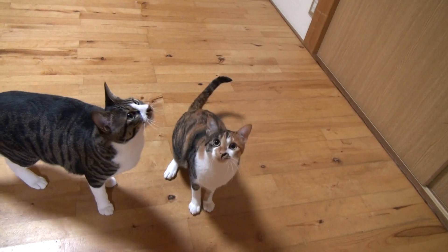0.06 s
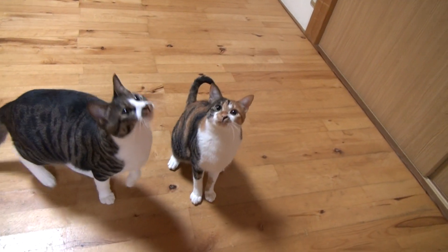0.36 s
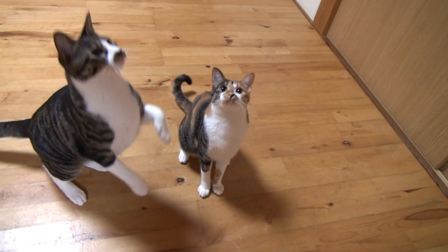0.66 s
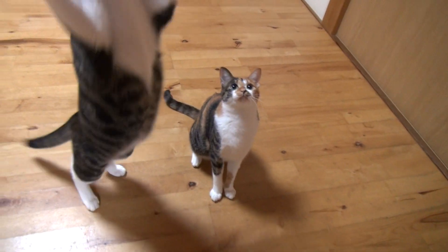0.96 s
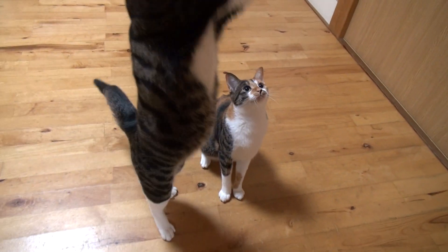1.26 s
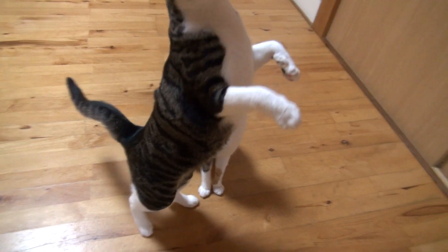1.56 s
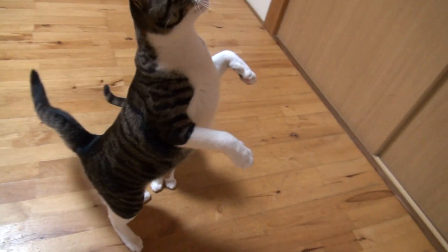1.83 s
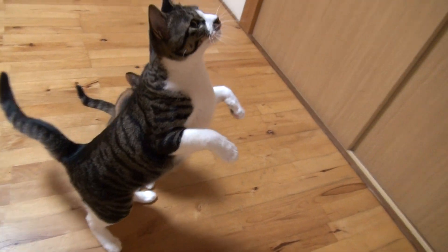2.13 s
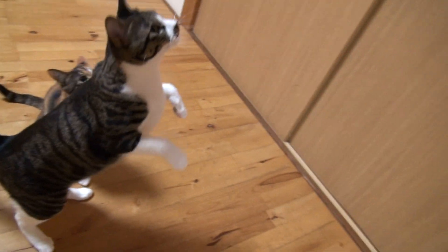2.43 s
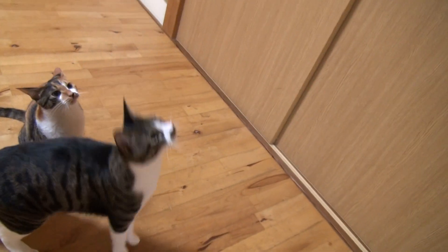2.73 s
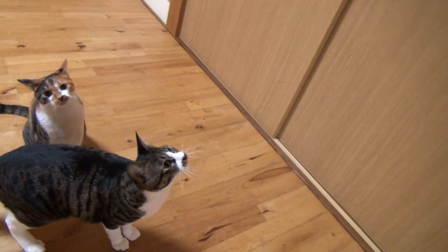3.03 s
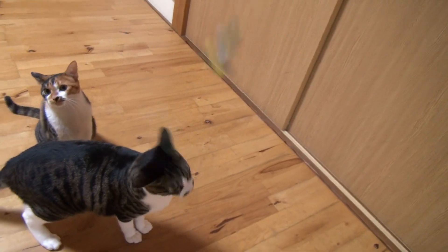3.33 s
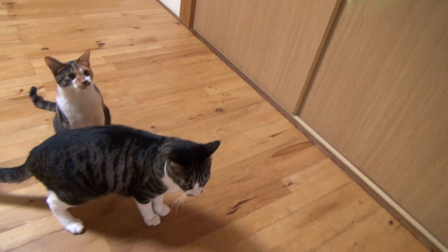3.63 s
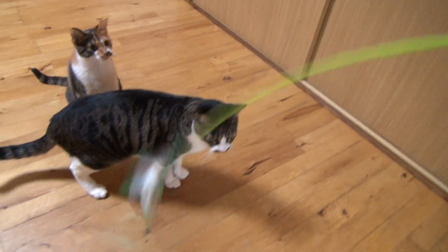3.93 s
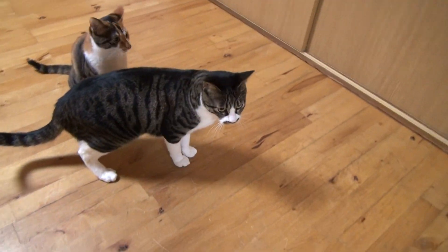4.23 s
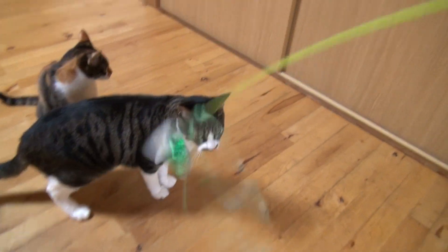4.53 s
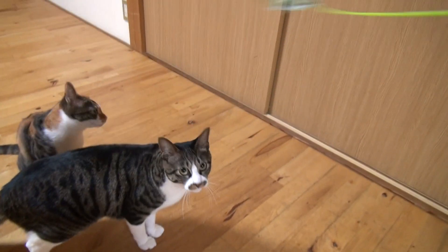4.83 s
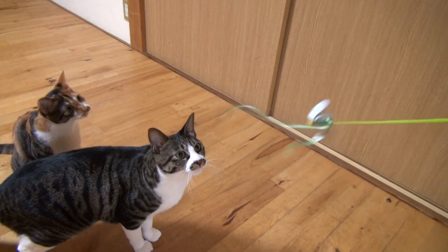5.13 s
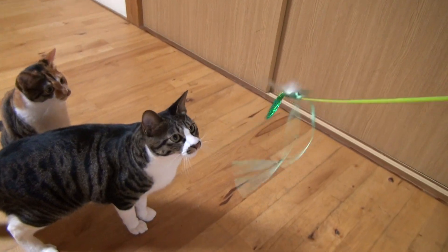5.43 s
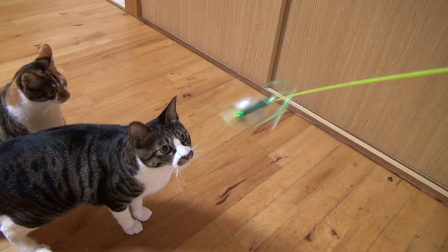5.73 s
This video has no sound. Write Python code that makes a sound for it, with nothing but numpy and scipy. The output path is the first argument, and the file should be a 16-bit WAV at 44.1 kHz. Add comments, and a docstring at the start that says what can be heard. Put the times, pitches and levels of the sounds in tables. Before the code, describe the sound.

Two cats play with a wand toy on a wooden floor, close to a stereo microphone in a small room. Light ticks and a tinsel rustle open the scene. From about 0.5 to 1 second comes a scramble of sharp claw clicks, paw knocks and scuffs, with the strongest knocks near 0.7. A second cluster follows from 1.2 seconds, peaking in the loudest, sharpest click at 1.4. The play thins to scattered ticks and short flicks of tinsel and feathers, with soft padded thumps around 2.1 and 2.8 seconds. Ticking, rustling and shuffling pick up from 2.8 to 3.4 seconds, ease briefly, and return with more light knocks from 4 to 4.7. After about 5 seconds only a very faint rustle remains. The room adds a little reverberation, and a quiet steady hiss lies underneath throughout.

```python
"""A small room with a wooden floor, a stereo microphone close to two cats playing with a wand toy.
Claws and the flicked toy tick sharply, and its tinsel and feathers rustle as it shakes.
Paws scuff and knock on the boards, and the bigger cat's steps thump the floor softly.
The room answers each sound, and a quiet steady hiss lies behind it all."""
import sys
import numpy as np
from scipy import signal
from scipy.fft import rfft, irfft
from scipy.io import wavfile

SR = 44100
rng = np.random.default_rng(int(sys.argv[2]) if len(sys.argv) > 2 else 0)


def pcm_store(signal):
    """Save signal as 16-bit PCM."""
    levels = np.round(np.clip(np.atleast_2d(signal), -1, 1) * 32767)
    wavfile.write(sys.argv[1], SR, levels.astype(np.int16).T)


N = 254739
TIME = np.arange(N) / SR


# claws and toy, close to the microphone: start_s, level_db, pitch_hz, spread_octaves, left_over_right_db
CLAW_TICKS = [(.0407, -22.5, 3550, 0.42, 0), (.1001, -20.5, 2900, 0.38, 2), (.2838, -25.5, 3300, 1, 8),
              (.4765, -24, 6300, 0.88, -4.5), (.5191, -28, 3400, 0.48, 6), (.5488, -10.5, 5200, 0.7, 8.5),
                       (.6225, -17, 4260, 0.96, -1), (.7045, -15, 1520, 1.3, -2),
              (.7275, -17.5, 3660, 0.93, 9), (.732, -19, 4500, 1.1, 3), (.7599, -18, 4350, 0.59, 5),
              (.82, -19.5, 3100, 0.78, -3), (.8965, -16.5, 6560, 0.43, -5), (.9443, -20, 4030, 0.85, 0),
              (1.131, -25, 6200, 0.64, -2), (1.1495, -24.5, 2940, 0.83, 1),
              (1.2915, -15.5, 4470, 0.34, -1.5), (1.3167, -20.5, 4330, 0.77, -1),
              (1.3491, -20.5, 6400, 0.78, -9), (1.3614, -17.5, 5700, 0.79, 4),
              (1.3707, -14, 7000, 0.82, -5), (1.3867, -16, 7100, 0.34, -2), (1.4009, -24, 6100, 0.79, -10),
              (1.4186, -4, 5560, 0.66, -2), (1.514, -19, 5550, .8, -1), (1.6087, -23, 4800, 1.2, -6),
              (1.6707, -23.5, 4200, 0.81, -1), (1.8017, -25, 5770, 0.76, -5), (2.1257, -28, 5440, 1.1, -8),
              (2.1312, -19, 5200, 0.55, 1), (2.5114, -25.5, 5330, 1.1, -1), (2.8079, -24, 2880, 0.87, 1),
              (2.8522, -25.5, 5500, 0.73, 0), (2.8908, -16.5, 5470, 0.91, -3),
              (2.9689, -24.5, 5160, 0.95, -5), (3.0957, -23.5, 3700, .8, 0),
              (3.1609, -13.5, 5800, 0.15, -3), (3.1967, -18, 3160, 0.71, 2), (3.2831, -19, 3760, 0.75, 2),
              (3.3084, -26, 2480, 0.39, 3), (3.3462, -24.5, 4070, 0.76, -5), (3.4458, -20.5, 4400, 0.7, 1),
              (3.9503, -22, 2320, 0.72, -1), (3.9712, -18, 3440, 0.44, 3), (4.0258, -20.5, 3300, 0.41, 5),
              (4.0702, -23, 3320, 0.67, 1), (4.1331, -21.5, 5500, 0.78, -9), (4.17, -19.5, 4300, 0.63, 2),
              (4.2185, -20, 3000, 0.99, 3), (4.2583, -20, 4740, 0.89, 0), (4.2915, -21, 4200, 0.44, -3),
              (4.3894, -19.5, 4370, 1.2, 2.5), (4.4625, -15, 3570, .55, 2), (4.469, -21.5, 4500, .8, 3),
              (4.5619, -27, 4200, 0.74, -3), (4.6638, -24.5, 4000, 1.1, 2), (4.827, -37, 5000, 0.71, 7)]

def ticks(clean_db=-19, lead_in_share=0.25, crunch=0.71, split=0.71, spot_count=4):
    """A faint, brief swell leads into a short ping; hard ticks snap clean, light ones crumble."""
    spots = np.zeros((spot_count, 2, N))  # each spot in the room gets its own reflections
    for k, (start_s, db, hz, octaves, pan_db) in enumerate(CLAW_TICKS + light_ticks()):
        looseness = np.clip(gain_of(1.3 * (clean_db - db)), 0.25, 1.2)
        lead_in = chatter(t60_s=0.013, share=lead_in_share * looseness)[:0:-1]  # reversed, so it swells
        contacts = np.concatenate([lead_in, chatter(t60_s=0.064, share=crunch * looseness)])
        # each contact is itself a flurry of slips within a millisecond or two
        slips = chatter(t60_s=0.0018, share=split * looseness, size=256)
        contact = np.convolve(ping(hz, max(octaves, 0.25)), slips)
        tick = signal.fftconvolve(contact, contacts)
        tick /= np.linalg.norm(tick)
        gains = gain_of(db + np.array([[pan_db], [-pan_db]]) / 2)
        add(spots[k % spot_count], start_s - len(lead_in) / SR - 0.0001, gains * tick)
    return sum(room(spot, wet_db=-6.5, build_s=0.00071, early=1.0, early_s=0.016) for spot in spots)


def light_ticks(over_shaking_db=20.5, vary_db=2, centre_hz=5000, vary_octaves=0.55, pan_db=4, count=64):
    """Rows of small chance ticks of the toy, more frequent and stronger the harder it shakes."""
    level, _ = shaking()
    shares = (np.arange(count) + rng.random(count)) / count
    starts = np.searchsorted(np.cumsum(level) / level.sum(), shares).clip(0, N - 1)
    rows = []
    for i, (force, pitch, side) in zip(starts, rng.standard_normal((count, 3))):
        db = 20 * np.log10(level[i]) + over_shaking_db + vary_db * force
        rows.append((i / SR, db, centre_hz * 2 ** (vary_octaves * pitch), 1.0, pan_db * side))
    return rows


# tone of the tinsel at close range: frequency_hz, gain_db
TINSEL_TONE = [(300, -4), (900, -4), (1800, -8), (3300, -2), (5000, -0.5), (8000, -4), (9500, -4.5),
               (11800, -2.5), (15500, -9)]

def tinsel_rustle(level_db=-0.5, tilt_per_octave=0.22, swish=0.4, scatter=0.32):
    """Tinsel strips snap by the hundreds at ten pitches, over a swish of feathers."""
    grains, power = np.zeros((2, N)), 0
    level, bright_db = shaking()
    for hz in np.geomspace(1400, 10000, 10):
        snaps = crackle(per_s=150, spread_db=3.5) + swish * rng.standard_normal(N)
        side = scatter * snaps * rng.standard_normal(N)
        pair = np.array([snaps + side, snaps - side])
        # brightness tips the spectrum about 4500 Hz
        weight = gain_of(tilt_per_octave * bright_db * np.log2(hz / 4500)) * (hz / 4500) ** 0.081
        grains += weight * signal.oaconvolve(pair, ping(hz, octaves=0.37)[None], axes=1)[:, :N]
        power += weight ** 2
    rustle = unit_rms(coloured(grains / np.sqrt(power), TINSEL_TONE))
    return room(rustle * level * gain_of(level_db), wet_db=-6.5)


# flicks of the wand: start_s, level_db, settle_s, brightness_db
WAND_FLICKS = [(0, -48.5, .14, -12), (.262, -56, .05, -6), (.548, -51, .17, -5), (0.711, -45, 0.074, 0),
               (0.821, -54, .05, 8), (0.884, -52.5, .11, -15), (1.213, -47, .06, 4),
               (1.345, -50.5, .22, -1), (1.752, -49.5, .07, 1), (1.946, -55.5, .06, 4),
               (2.035, -59, .04, 3), (2.117, -52, 0.065, -1), (2.51, -55, .07, 5), (2.69, -56.5, .07, -3),
               (2.805, -49, .05, -7), (2.889, -49.5, .06, 3), (2.993, -51, .06, -1),
               (3.089, -50, 0.043, -18), (3.185, -48, .08, -3), (3.461, -58.5, .15, -30),
               (3.718, -53, .09, -1), (3.96, -50, .17, -3), (4.189, -51.5, .12, -1), (4.336, -48.5, .07, 3),
               (4.455, -47, .08, -1), (4.55, -55.5, .12, 7), (4.645, -55, .06, 3), (4.8, -55, .09, -9)]

def shaking(rise_s=0.011, sway_db=-62, sway_bright_db=-1):
    """Level and brightness of the tinsel: each flick rises fast and settles, over the wand's sway."""
    power = gain_of(sway_db + liveliness_db()) ** 2
    brightness = sway_bright_db * power
    for start_s, db, settle_s, bright_db in WAND_FLICKS:
        t = np.maximum(TIME - start_s, 0)
        flick = gain_of(db) * np.minimum(t / rise_s, 1) * np.exp(-np.maximum(t - rise_s, 0) / settle_s)
        power += flick ** 2
        brightness += bright_db * flick ** 2
    return np.sqrt(power), brightness / power


# how lively the play is between flicks and strokes: time_s, level_db
LIVELINESS = [(0, -1.5), (.4, -5), (.8, -0.5), (1.1, -2), (1.6, 1.5), (2.3, -1.5), (2.75, -2.5), (3.35, 3),
              (3.85, 0.5), (4.3, 3), (4.8, 0), (5.15, -12.5), (5.45, -15), (5.78, -9)]

def liveliness_db():
    """The slow rise and fall of the play, at every sample."""
    return np.interp(TIME, *np.transpose(LIVELINESS))


# paws knocking on the nearby boards: start_s, level_db, pitch_hz
PAW_KNOCKS = [(0.519, -40.5, 900), (.580, -39, 700), (.616, -41.5, 400), (.661, -35.5, 597),
              (.7044, -32, 880), (.727, -26.5, 430), (.7329, -28.5, 700), (0.756, -32.5, 477),
              (1.021, -44, 540), (1.25, -36, 556), (1.411, -35.5, 566), (1.498, -37.5, 450),
              (2.099, -46, 540), (2.702, -39, 477), (3.002, -39.5, 406), (3.026, -40, 550),
              (3.182, -36.5, 560), (3.215, -39, 560), (3.283, -47, 400), (4.159, -40, 700),
              (4.245, -37.5, 600), (4.32, -39, 480), (4.358, -38, 670), (4.436, -34.5, 437)]
# the boards' answer to a paw: frequency_hz, gain_db
BOARD_TONE = [(60, -15), (140, -6.5), (210, 5.5), (310, -0.5), (410, -1.5), (540, -0.5), (700, -6),
              (1000, 0.5), (2000, 1), (5000, -17)]

def paw_knocks(level_db=-2.5):
    """Blunt blows that spread briefly through the boards."""
    blows = np.zeros((2, N))
    for start_s, db, hz in PAW_KNOCKS:
        blow = np.convolve(ping(hz, octaves=0.53), chatter(t60_s=0.034, share=0.88))
        add(blows, start_s, gain_of(level_db + db) * blow / abs(blow).max())
    return room(coloured(blows, BOARD_TONE), wet_db=-6, width=0.11, early=0.68)


# the bigger cat's soft landings, centred between the channels: start_s, level_db, contact_s
PAW_STEPS = [(.060, -52, .008), (0.5, -60, 0.0067), (0.729, -51.5, 0.0015), (1.25, -58, 0.0055),
             (1.505, -49, 0.003), (1.728, -53, 0.017), (2.094, -48.5, 0.0071), (2.829, -45.5, 0.0084),
             (3.953, -56.5, 0.0054), (4.143, -59, 0.0029)]
# modes of the wooden floor: pitch_hz, level_db, t60_s
FLOOR_MODES = [(79, -1.5, 0.2), (99, -1, 0.11), (129.4, 1.5, 0.1), (159.3, -4.5, 0.47), (188, -8, 0.54),
               (216.5, -11, 0.62), (271.5, -5.5, 0.27)]

def paw_steps(level_db=2, low_cut_hz=69):
    """A padded paw presses smoothly on the floor, which rings in its low modes but gives no deep bass."""
    thumps = np.zeros((2, N))
    t = np.arange(SR // 2) / SR
    # neighbouring modes swing in opposite directions
    ring = sum((-1) ** k * gain_of(db - 60 * t / t60_s) * np.sin(2 * np.pi * hz * t)
               for k, (hz, db, t60_s) in enumerate(FLOOR_MODES))
    ring = signal.sosfilt(signal.butter(5, low_cut_hz, "high", fs=SR, output="sos"), ring)
    for start_s, db, contact_s in PAW_STEPS:
        push = (t / contact_s) ** 2 * np.exp(-6 * t / contact_s)
        thump = signal.fftconvolve(np.gradient(push), ring)[:len(t)]
        add(thumps, start_s, gain_of(level_db + db) * thump / abs(thump).max())
    return room(thumps, wet_db=-3.5, width=0.089)


# strokes over the boards, close and nearly dry: peak_s, level_db, release_s
PAW_STROKES = [(.09, -56.5, 0.2), (.615, -51, 0.12), (.738, -45.5, 0.064), (.87, -53.5, .1),
               (1.24, -56, 0.12), (1.42, -49, 0.033), (1.52, -57, 0.19), (1.77, -52, 0.047),
               (2.13, -58.5, 0.079), (2.84, -52.5, .09), (3.02, -51, 0.11), (3.11, -55, 0.039),
               (3.21, -48.5, 0.14), (3.559, -52.5, 0.028), (4.06, -55, 0.1), (4.225, -54.5, 0.34),
               (4.45, -50.5, 0.023), (4.67, -55, 0.043)]
# tone of pads and fur rubbing: frequency_hz, gain_db
PAD_TONE = [(60, -15.5), (140, 0.5), (250, -0.5), (550, 2.5), (900, -2.5), (1500, -7), (2500, -16),
            (6000, -20.5)]

def paw_scuffs(level_db=-2.5, shuffle_db=-64, build_share=0.53, smooth=0.56, body=0.36):
    """Pads and fur catch and slip in small dull grains that sound the boards."""
    slips = crackle(per_s=350, spread_db=1.0) + smooth * rng.standard_normal(N)
    boards = [(hz, body * db) for hz, db in BOARD_TONE]
    grains = coloured(coloured(slips, PAD_TONE), boards)
    # each stroke builds and lets go, over a light shuffle of paws
    power = gain_of(shuffle_db + liveliness_db()) ** 2
    for peak_s, db, release_s in PAW_STROKES:
        age = (TIME - peak_s) / release_s
        power += (gain_of(db) * np.exp(-np.maximum(age, -age / build_share))) ** 2
    rub = unit_rms(grains) * np.sqrt(power) * gain_of(level_db)
    return room(np.array([rub, rub]), wet_db=-15, width=0.36)


# decay curve of the small room, with a deep notch near 400 Hz: frequency_hz, t60_s
ROOM_DECAY = [(100, 0.9), (400, -0.07), (1500, 3.2), (5000, 1.23), (8000, 0.95), (14000, 0.74)]
# tone of the reflections reaching the microphone: frequency_hz, gain_db
ROOM_TONE = [(100, -1), (500, 4), (2000, -2), (5000, 0), (8000, 2.5), (13000, 2.5)]

def room(x, wet_db, width=0.47, build_s=0.00074, early=9.8, early_s=0.0063):
    """Direct sound plus dense reflections, strongest early on, partly alike in both channels."""
    t = np.arange(SR * 3 // 4) / SR
    echoes = rng.standard_normal((2, len(t))) * (rng.random((2, len(t))) < 1 / 8)
    echoes *= (1 - np.exp(-(t / build_s) ** 2)) * (1 + early * np.exp(-t / early_s))
    hz, delay_s, bands = signal.stft(echoes, SR, nperseg=256)
    bands *= gain_of(at_hz(ROOM_TONE, hz)[:, None] - 60 * delay_s / at_hz(ROOM_DECAY, hz)[:, None])
    tail = signal.istft(bands, SR, nperseg=256)[1]
    tail /= np.linalg.norm(tail[0])
    mid, side = signal.fftconvolve(x.mean(0)[None], tail, axes=1)[:, :N]
    return x + gain_of(wet_db) * np.array([mid + width * side, mid - width * side])


# tone of the hiss behind the play: frequency_hz, gain_db
HISS_TONE = [(25, -41), (50, -34), (70, -19.5), (120, -26.5), (220, -19), (400, -11.5), (600, -10.5),
             (780, -4.5), (950, -6), (1130, -2), (1400, -9), (2000, -9.5), (3200, -15), (8000, -21.5),
             (15500, -32)]
# how alike it is left and right: frequency_hz, correlation
HISS_LIKENESS = [(100, 0.8), (400, 0.42), (1100, 0.73), (3000, 0.47), (12000, 0.93)]

def hiss(level_db=-59):
    """Steady background hiss with a soft hump near 1 kHz."""
    left, unrelated = rfft(rng.standard_normal((2, N)))
    likeness = at_hz(HISS_LIKENESS, np.fft.rfftfreq(N, 1 / SR))
    right = likeness * left + np.sqrt(1 - likeness ** 2) * unrelated
    pair = irfft(np.array([left, right]), N)
    return gain_of(level_db) * unit_rms(coloured(pair, HISS_TONE))


# the microphone's response to sharp contacts: frequency_hz, gain_db
MIC_RESPONSE = [(30, -21), (150, -2), (600, 4), (2400, -1.5), (3700, -2), (5100, 1), (6500, 3), (8100, 2.5),
                (9600, -2), (12000, 0), (15500, -15)]

def ping(hz, octaves, skirt=0.52, size=1024):
    """One heavily damped contact at the microphone, energy 1; its sharp start gives it wide skirts."""
    f = np.fft.rfftfreq(size, 1 / SR) + 1
    detune = np.log2(f / hz) / (2 * octaves)
    log_gain = np.maximum(-detune ** 2 / np.hypot(1, skirt * detune) - 0.5 * np.log(f / hz), -6)
    cepstrum = irfft(log_gain + np.log(gain_of(at_hz(MIC_RESPONSE, f))))
    # minimum phase: nothing sounds before the contact
    cepstrum[1:size // 2] *= 2
    cepstrum[size // 2 + 1:] = 0
    wave = irfft(np.exp(rfft(cepstrum)))
    return wave / np.linalg.norm(wave)


def chatter(t60_s, share, size=2048):
    """A blow followed by a dying scatter of smaller contacts."""
    contacts = rng.standard_normal(size) * gain_of(-60 * np.arange(size) / SR / t60_s)
    contacts *= share / np.linalg.norm(contacts)
    contacts[0] = 1
    return contacts


def crackle(per_s, spread_db):
    """Random clicks, most of them small, a few large."""
    sizes = gain_of(spread_db * np.minimum(rng.exponential(1, N), 4))
    signs = rng.choice([-1, 1], N)
    return unit_rms(sizes * signs * (rng.random(N) < per_s / SR))


def gain_of(db):
    """Decibels to amplitude."""
    return 10 ** (np.asarray(db) / 20)


def unit_rms(x):
    """Scales to rms 1."""
    return x / np.sqrt(np.mean(x ** 2) + 1e-20)


def at_hz(points, hz):
    """Reads a table on a log-frequency axis."""
    f, value = np.transpose(points)
    return np.interp(np.log(hz + 1), np.log(f + 1), value)


def coloured(x, tone):
    """Filters a signal by a tone table."""
    hz = np.fft.rfftfreq(x.shape[-1], 1 / SR)
    return irfft(rfft(x) * gain_of(at_hz(tone, hz)), x.shape[-1])


def add(mix, start_s, sound):
    """Mixes a sound in at start_s."""
    part = mix[..., max(round(start_s * SR), 0):][..., :sound.shape[-1]]
    part += sound[..., :part.shape[-1]]


def scene():
    """The whole play, heard from the microphone's place in the room."""
    return ticks() + paw_knocks() + paw_steps() + tinsel_rustle() + paw_scuffs() + hiss()


def record(dry):
    """The recorder cuts the treble above 15.9 kHz."""
    lowpass = signal.firwin(511, 15900, window=("kaiser", 9), fs=SR)
    return signal.oaconvolve(dry, lowpass[None], "same")


dry = scene()
out = record(dry)
pcm_store(out)
```